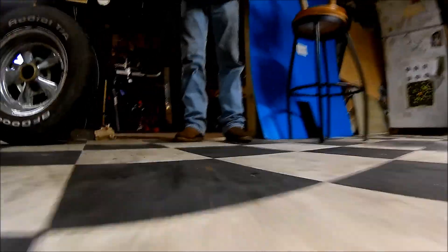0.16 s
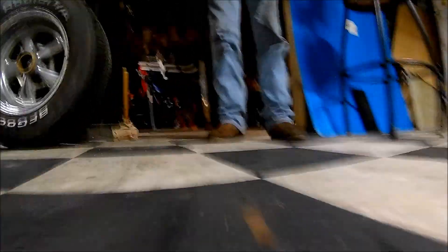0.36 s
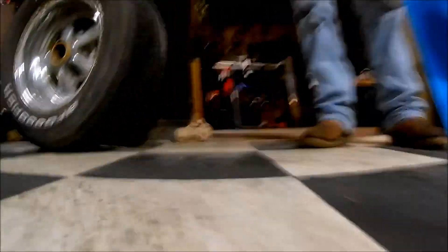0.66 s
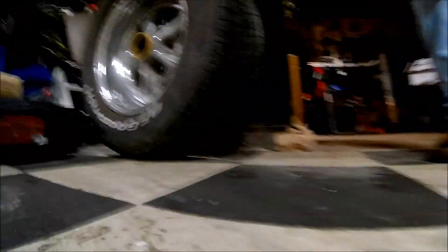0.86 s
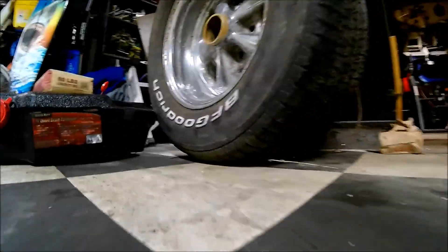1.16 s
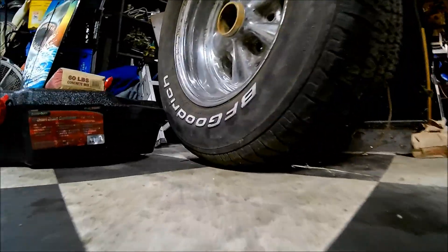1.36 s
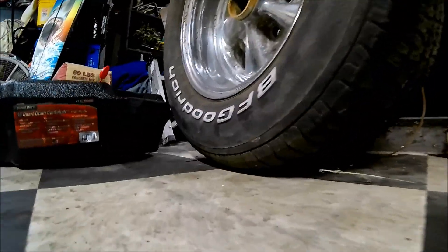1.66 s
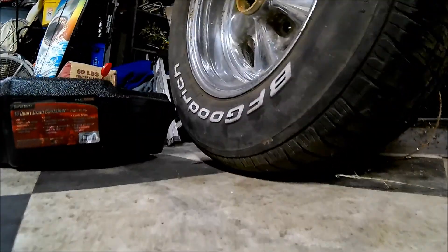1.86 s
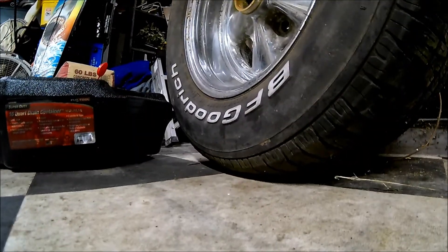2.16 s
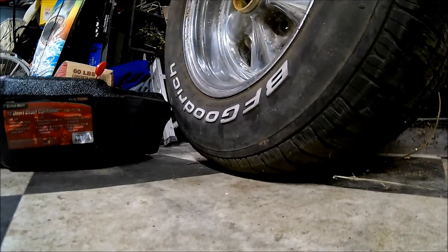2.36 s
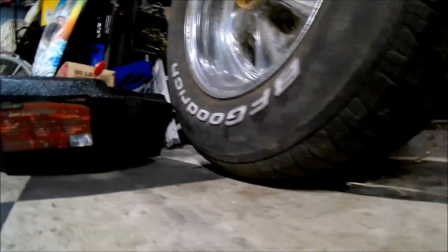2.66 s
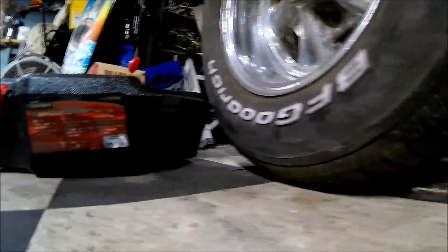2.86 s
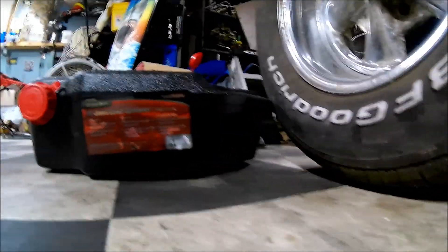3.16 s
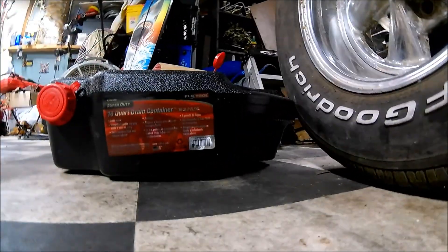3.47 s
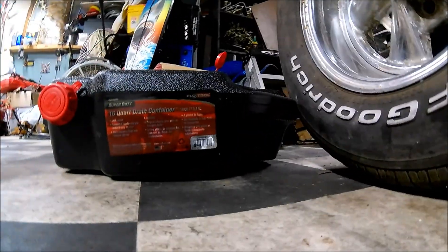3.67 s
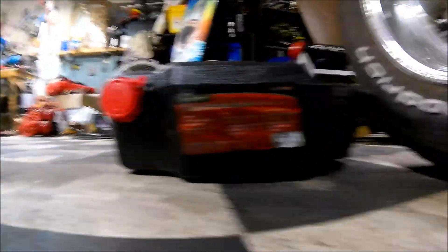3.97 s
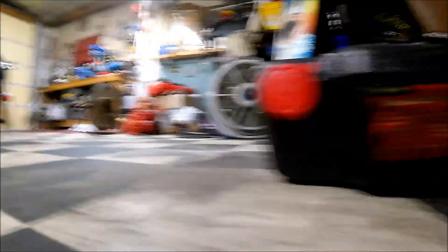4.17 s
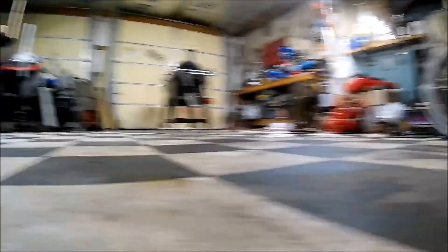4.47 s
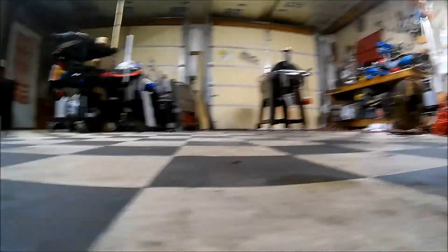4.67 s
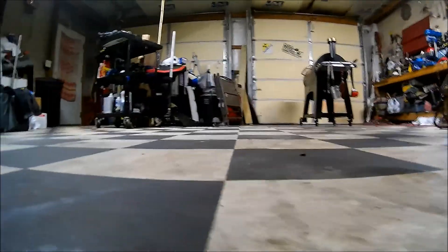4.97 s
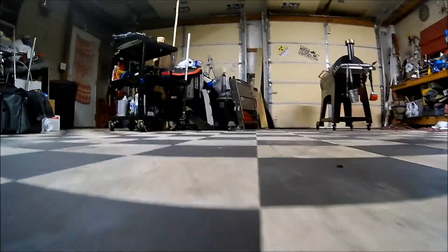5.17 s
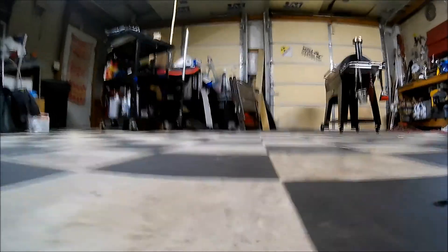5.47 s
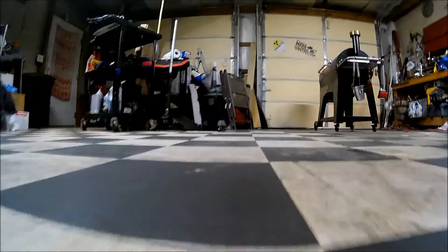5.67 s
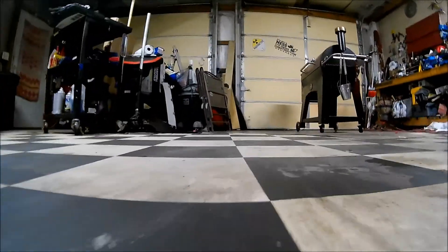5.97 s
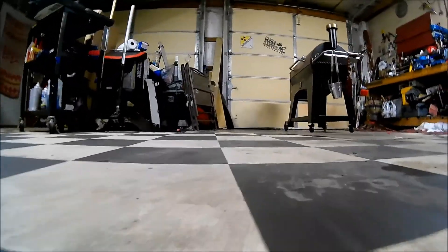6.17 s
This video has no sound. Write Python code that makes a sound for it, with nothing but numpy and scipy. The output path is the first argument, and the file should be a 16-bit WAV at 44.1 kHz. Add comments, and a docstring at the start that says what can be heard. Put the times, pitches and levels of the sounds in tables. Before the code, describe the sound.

Close, rough propeller buzz with breathy air rush rises and falls with the throttle, amid scraping, rattling and sharp knocks on a hard floor.

```python
"""A buzzing hum with its fundamental near 320 Hz, in rushing air, is heard first; scrapes and knocks join at once.
A small floor craft in a garage is driven by a three-blade electric propeller, its camera fixed to the frame.
Harmonics of the blade-pass frequency and filtered turbulence follow rotor speed; a tyre close by lifts the low tones.
The hull's modes, excited by random grit and contact chatter, scrape and knock on the tiles.
Frame resonances and the camera case colour the sound."""
import sys
import numpy as np
from scipy import signal
from scipy.fft import rfft, irfft, next_fast_len
from scipy.io import wavfile
from scipy.ndimage import uniform_filter1d

SR = 44100
rng = np.random.default_rng(int(sys.argv[2]) if len(sys.argv) > 2 else 0)


def waveform_to_disk(signal):
    """Save audio, clipped to [-1, 1], as 16-bit WAV at the path in sys.argv[1]."""
    frames = np.transpose(np.atleast_2d(signal))
    scaled = np.clip(frames, -1, 1) * 32767
    samples = np.round(scaled).astype(np.int16)
    wavfile.write(sys.argv[1], SR, samples)


N = 279153  # samples
BLADES = 3
REFERENCE_HZ = 270  # blade-pass frequency at which the speed laws are stated
SWITCH_HZ, TOP_HZ = 7994, 15700  # motor controller's switching tone; camera's band limit

# Rotor throttle: t/s, blade-pass f/Hz before inertia, shift of tones 1-3 level/dB,
# shift of tones 7 upwards level/dB, 4th, 5th and 6th tone level/dB before gusts
THROTTLE = [(0.0, 323.4, 2, -2, -45, -32.5, -42), (0.2, 321.5, -3, -1.5, -43.5, -34, -47),
            (0.351, 320.2, -0.5, -1, -46, -35, -40), (0.42, 302.7, -0.5, 1, -53, -39.5, -43),
            (0.5, 268.7, 0.5, -3.5, -53, -55, -39), (0.6, 231.3, -5, -8, -49.5, -43, -45),
            (0.67, 228.7, -10.5, -3, -54.0, -53, -49), (0.791, 245.9, -8, 0.5, -51, -44.5, -46),
            (0.9, 240, -5.5, -6.5, -53, -52, -42.5), (1.04, 241.7, -7, -1.5, -51.5, -45, -43.5),
            (1.18, 245.4, -4, -6.5, -52, -46, -40), (1.299, 225.1, -8, -2, -49, -50, -53),
            (1.4, 233.7, -3.5, -2, -71, -45.5, -46), (1.7, 242.8, -4.5, -3, -49, -48.5, -50),
            (1.85, 244.6, -0.5, 2.5, -46, -46, -35.5), (2.1, 243.7, -1, -3.5, -49, -60, -50),
            (2.34, 247.8, 0, -2, -58, -51.5, -41.5), (2.49, 276.3, 5, -2, -45, -44, -43.5),
            (2.59, 283.6, 0.5, -2.5, -60, -46.5, -40.5), (2.8, 284.3, 3, -2.5, -51.5, -44, -50.5),
            (3.02, 287, -1, -0.5, -49, -39, -43), (3.13, 276, 0, 0, -46, -39, -43.5),
            (3.24, 271.7, 3, -5, -51, -46.0, -44.5), (3.45, 269.6, 1.5, -0.5, -48, -55, -47),
            (3.66, 273.3, -0.5, -3.5, -49.5, -46.5, -43), (3.75, 285.7, -4, 3, -51, -45.5, -46),
            (3.88, 320.9, 1.5, -0.5, -44.5, -37.5, -42), (4.03, 344.1, 0, -0.5, -45, -44, -42.5),
            (4.12, 350.7, -0.5, 0.5, -38, -38.5, -40.5), (4.199, 338, -1.5, 2.5, -31.5, -41.5, -46),
            (4.3, 293.3, -5, 2, -49, -37.5, -38.5), (4.35, 275.8, -3.5, 1.5, -46.5, -41, -47),
            (4.44, 239.9, -5.5, 0.5, -50, -68, -44.5), (4.6, 192.5, -8.5, -2.5, -53, -52, -62),
            (4.72, 178.4, -9.5, -5.5, -63, -66, -66), (4.81, 187.3, -3.5, -7.5, -48, -68, -57),
            (4.9, 229.9, -3, -0.5, -50.5, -56, -49.5), (4.97, 267.5, -6, 2.5, -47, -59, -43),
            (5.04, 303, -3, 0, -50, -44, -39), (5.11, 325, 0.5, -1, -52, -41, -44),
            (5.22, 335.5, 0.5, -1, -45.5, -33, -37), (5.34, 346.1, 3, -3.5, -41, -37.5, -38),
            (5.45, 336.2, 2, -3, -44.5, -33, -38.5), (5.57, 293.8, -1.5, 0.5, -57, -39.5, -44),
            (5.73, 306, 2, -8, -51, -36, -42), (5.86, 287.7, -4, -1.5, -45, -40.5, -45),
            (5.99, 268.4, -5, -1.5, -50, -48, -41), (6.12, 266.1, -2, -2, -49, -49.5, -41),
            (6.26, 277.5, 1.5, -4.5, -46, -46.5, -40), (6.33, 269.6, -2, 0, -47, -44, -41)]
# Shaft and magnet orders: order per turn, level/dB at the reference, slope/(dB per octave of speed)
SHAFT_ORDERS = [(4, -65, 26.5), (5, -66.5, 27.5), (7, -72.5, 15.5), (8, -61, 5), (13, -57.5, 19),
                (42, -73, 30.5)]
# Frame gain on blade tones 7 upwards: f/Hz, gain/dB
FRAME_GAIN = [(650, 14), (1000, -7), (1300, -1.5), (1600, 1), (1800, -4.5), (2000, -1.5), (2200, -1),
              (2350, 0), (2520, -4.5), (2750, -20.5), (3100, -14.5), (3500, -20.5), (4000, -27),
              (4400, -32.5), (4850, -28), (5300, -40.5), (6000, -56)]
# Spectral shape of the air rush: f/Hz, relative density level/dB
AIR_SPECTRUM = [(60, -64.5), (150, -22.5), (400, -19), (700, -10.5), (1100, -8), (1500, -3.5), (1800, -5.5),
                (2300, -1.5), (2550, -6.5), (2800, -13.5), (4000, -18), (4900, -20.5), (5600, -35),
                (6200, -47)]
# Hull modes: centre f/Hz, width f/Hz, relative level/dB
HULL_MODES = [(258, 108, -6.5), (740, 290, -0.5), (1193, 340, -1), (1560, 526, 0.5), (1894, 220, 1),
              (2300, 750, -8.5)]
# Knocks on the tiles: t/s, relative drive of the crack level/dB, of the thud level/dB
KNOCKS = [(0.0827, -9, -21.5), (0.1162, -17, -21), (0.144, -8, -45), (0.225, -9, -60), (0.3222, -8, -67),
          (0.379, -13, -61), (0.4855, -6.5, -44), (0.509, -8, -42), (0.575, -6.5, -61), (0.762, -15, -30),
          (0.7971, -9.5, -26.5), (0.8082, -6.5, -45), (0.8102, -2.5, -38), (0.8144, -7, -48),
          (0.9395, -14, -26), (2.4891, -22.5, -37), (4.4465, -34, -23.5), (5.3998, -19, -20),
          (5.589, -11.5, -37), (5.6497, -7, -42), (5.7346, -4.5, -54), (5.77, -7, -60), (5.78, -13, -43),
          (5.826, -21, -47), (5.8657, -8, -58), (5.882, -13, -48), (5.968, -15, -50)]
# Shape of the faint treble above the microphone's roll-off: f/Hz, relative density level/dB
TREBLE_SPECTRUM = [(5500, -48), (6200, -6), (6400, -5.5), (6520, -11.5), (6650, -6), (6950, 0.5),
                   (7350, -7), (7500, -19.5), (7650, -6.5), (7900, -1.5), (9500, -7), (12500, -21.5),
                   (15500, -17.5)]
# Bursts of crackling grit: t/s, half-length (to 1/e) t/s, peak level/dB
CRACKLE_BURSTS = [(.07, .01, -82), (.135, .02, -81), (.213, .002, -81), (.29, .008, -83), (.47, .012, -84),
                  (.493, .002, -76), (.508, .004, -80), (.578, .006, -82), (.81, .012, -86)]
# Colour of the crackle, on top of the treble shape: f/Hz, gain/dB
GRIT_COLOUR = [(5500, -5), (7800, -5), (8800, 0.5), (10500, -0.5), (15500, -6.5)]
# High motor tones: start f/Hz, shaft orders added, level/dB at the reference before the case's gain
MOTOR_TONES = [(7994, -14, -99), (0, 70, -105), (0, 78, -110)]
# Camera case resonance: centre f/Hz, width f/Hz, gain/dB
CASE_RESONANCE = (6350, 70, 12)
# Nearness of the tyre that throws the sound back: t/s, nearness from 0 to 1
TYRE_NEARNESS = [(0, 0), (.6, 0.1), (1.3, 0.3), (1.8, 0.79), (3.0, 0), (4.2, 1), (4.8, 1), (5.2, 0.07),
                 (6.33, 0)]
# Speed laws below: level/dB at the reference, slope/(dB per octave of speed), shift/dB at the tyre
# Blade tones 1-3, before throttle shift, gusts and frame resonance
LOW_TONE_LAWS = [(-50.5, 24, 3), (-49.5, 10, 7), (-49.5, 13, 6.5)]
# Blade tones 7 upwards, before throttle shift, gusts and frame gain
UPPER_TONE_LAW = (-43.5, 11.4, 0)
# Unbalance once and twice a turn, before frame resonance
UNBALANCE_LAWS = [(-68.5, 38, -0.15), (-69.5, 34.5, 0.0013)]
# Air rush, before its flicker and added treble
AIR_LAW = (-40.8, 10, -2)
# Hull sliding on the tiles: t/s, rumble level/dB before a fixed 9 dB lift, rattle level/dB
SLIDE = [(0, -53, -39.5), (.3, -56, -35.5), (.42, -54.5, -37), (.5, -49, -35.5), (.62, -58, -44),
         (.75, -50.5, -40.5), (1.0, -55, -41.5), (1.3, -55.5, -47), (1.57, -57.5, -47), (1.75, -64, -44.5),
         (2.3, -71, -50), (3.1, -62, -49), (3.7, -70, -52), (4.3, -58, -47), (4.55, -63.5, -44.5),
         (4.67, -65, -45), (4.72, -68, -54), (5.0, -58, -55), (5.25, -51, -48.5), (5.6, -51, -39),
         (5.8, -52.5, -40), (5.95, -53.5, -37), (6.33, -53, -43)]
# Frame resonances met by gliding tones: centre f/Hz, width f/Hz, gain/dB (negative damps)
FRAME_RESONANCES = [(103, 27, 6), (157.7, 12, 13.5), (234, 51, 5), (560, 37, 0.5), (818, 24, -5.5),
                    (848, 40, 8), (1060, 160, -1.5)]


def amp(db):
    """Decibel law: amplitude ratio from level."""
    return 10 ** (np.asarray(db) / 20)


def unit(x):
    """Normalisation to rms 1."""
    return x / np.sqrt(np.mean(x ** 2) + 1e-20)


def along(points, hz):
    """Interpolation of (f/Hz, level/dB) points on a log frequency axis; -120 dB outside."""
    f, level_db = np.transpose(points)
    return np.interp(np.log(hz + 1), np.log(f + 1), level_db, left=-120, right=-120)


def curves(rows):
    """Linear interpolation in time: one value per sample for each column after t/s."""
    times, *columns = np.transpose(rows)
    t = np.arange(N) / SR
    return [np.interp(t, times, column) for column in columns]


def wobble(rate):
    """Slow random modulation: Gaussian knots, rate per second, joined by straight lines."""
    return np.interp(np.arange(N) * rate / SR, np.arange(4000), rng.standard_normal(4000))


def filtered(x, response):
    """Linear filtering: the spectrum of x times a response of frequency, zero-padded."""
    m = next_fast_len(N + SR // 2)
    spectrum = rfft(x, m) * response(np.fft.rfftfreq(m, 1 / SR))
    return irfft(spectrum, m)[..., :N]


def resonance_db(hz, centre, width, gain_db):
    """Resonance: a bell of gain in dB about its centre, half as many dB at the edges of its width."""
    return gain_db / (1 + (2 * (hz - centre) / width) ** 2)


def hull(f, modes=HULL_MODES):
    """Modal superposition: causal resonances of alternating sign; soft plastic passes little treble."""
    ring = 0
    for k, (centre, width, db) in enumerate(modes):
        mode = 1j * f * width / (centre * centre - f * f + 1j * f * width)
        ring = ring + (-1) ** k * amp(db) * mode
    return ring / (1 + 1j * f / 3800 / 0.93 - (f / 3800) ** 2) ** 3


def tone(angle, db, flicker_db, sway):
    """Amplitude and phase modulation: a sine wavers as the blades cut uneven air."""
    phase = angle + sway * (wobble(30) + .8 * wobble(90) + wobble(2.5))
    flicker = .3 * wobble(10) + .6 * wobble(28) + wobble(60) + .7 * wobble(130)
    return np.sqrt(2) * amp(db + flicker_db * flicker) * np.cos(phase)


def blade_pass():
    """Rotor inertia: a moving average rounds every change of the blade-pass frequency in Hz."""
    frequency = curves(np.array(THROTTLE)[:, :2])[0]
    return uniform_filter1d(frequency, size=1500, mode="nearest")


def speed_octaves():
    """Logarithmic speed: octaves of blade-pass frequency from the reference."""
    return np.log2(blade_pass() / REFERENCE_HZ)


def by_speed(db, slope_db, near_db):
    """Power law of speed: the level climbs with the rotor and shifts near the tyre."""
    return db + slope_db * speed_octaves() + near_db * np.clip(curves(TYRE_NEARNESS)[0], 0, 1)


def lifted(hz):
    """Structural resonance: summed gain in dB that the frame gives a tone."""
    return sum(resonance_db(hz, *ring) for ring in FRAME_RESONANCES)


def blade_tones(angle):
    """Harmonic series of the blade pass: clean low tones, a flickering whine and upper tones."""
    pass_hz = blade_pass()
    _, low_db, upper_db, *whine_db = curves(THROTTLE)
    # uneven inflow shakes the tones together, the lowest three only slightly
    gust_db = .7 * wobble(9) + 1.5 * wobble(30) + 1.3 * wobble(110)
    # changing speed roughens the tones from the 4th upwards
    strain = 1 + np.abs(np.gradient(pass_hz)) * SR / 450

    def blade(k):
        """Dispersion: the ringing frame smears each pass, so higher tones lag."""
        return k * angle - .11 * k * k

    sound = np.zeros(N)
    for k, law in enumerate(LOW_TONE_LAWS, start=1):
        level_db = by_speed(*law) + low_db + 0.18 * gust_db + lifted(k * pass_hz)
        sound += tone(blade(k), level_db, flicker_db=1.73, sway=0.032)
    for k, db in enumerate(whine_db, start=4):
        sound += tone(blade(k), db + .8 * gust_db, flicker_db=2.2, sway=.27 * strain)
    rest_db = by_speed(*UPPER_TONE_LAW) + upper_db + gust_db
    for k in range(7, 22):
        level_db = rest_db + along(FRAME_GAIN, k * pass_hz)
        sound += tone(blade(k), level_db, flicker_db=3, sway=.046 * min(k, 10) * strain)
    return sound


def shaft_tones(angle):
    """Rotational orders: weak shaft and magnet tones, and unbalance once and twice a turn."""
    turn = angle / BLADES
    sound = np.zeros(N)
    for order, db, slope_db in SHAFT_ORDERS:
        sound += tone(order * turn, by_speed(db, slope_db, 0), flicker_db=2.5, sway=0.93)
    for order, law in enumerate(UNBALANCE_LAWS, start=1):
        level_db = by_speed(*law) + lifted(order * blade_pass() / BLADES)
        sound += tone(order * turn, level_db, flicker_db=1.44, sway=.05)
    return sound


def air(angle):
    """Blade-tip turbulence: patchy noise puffs once per blade pass; faster tips hiss brighter."""
    octaves = speed_octaves()
    cells = signal.stft(rng.standard_normal(N), nperseg=512)[2]
    # smoothing over frequency, then time, makes patches
    patches = uniform_filter1d(uniform_filter1d(rng.standard_normal(cells.shape), 5, 0), 6, 1)
    noise = signal.istft(cells * amp(1.0 * unit(patches)), nperseg=512)[1][:N]
    puffs = noise * (1 + 0.057 * np.cos(angle))
    rush = unit(filtered(puffs, lambda hz: amp(along(AIR_SPECTRUM, hz))))
    top = filtered(rush, lambda hz: 1 / (1 + (4200 / (hz + 1)) ** 6))
    treble = unit(filtered(puffs, lambda hz: amp(along(TREBLE_SPECTRUM, hz))))
    # the band above 4200 Hz gains a further 12 dB per octave of speed
    bright = top * (amp(12.0 * octaves) - 1) + amp(-45.0 + 3 * octaves) * treble
    return amp(by_speed(*AIR_LAW) + 0.23 * wobble(34)) * (rush + bright)


def motor_whine(angle):
    """Sidebands and orders: the switching tone's lower sideband and high shaft orders, lifted by the case."""
    t = np.arange(N) / SR
    sound = np.zeros(N)
    for start_hz, order, db in MOTOR_TONES:
        hz = start_hz + order * blade_pass() / BLADES
        phase = 2 * np.pi * start_hz * t + order * angle / BLADES
        level_db = by_speed(db, 6, 0) + resonance_db(hz, *CASE_RESONANCE)
        sound += tone(phase, level_db, flicker_db=1.7, sway=.1)
    return sound


def rumble():
    """Sliding friction: sparse random grit impulses excite the hull's two lower modes."""
    grit = (rng.random(N) < .05) * rng.standard_normal(N) * amp(3 * wobble(30))
    ringing = unit(filtered(grit, lambda f: hull(f, HULL_MODES[:2]) / (1 + 1j * f / 900)))
    return amp(curves(SLIDE)[0] + 9.0) * ringing


def rattle_and_crackle():
    """Impulsive friction: clumped ticks rattle the upper modes and crackle faintly in the treble."""
    rattle_db = curves(SLIDE)[1]
    ticks = (rng.random(N) < .03) * rng.standard_normal(N) * amp(2.3 * wobble(45))
    rattle = unit(filtered(ticks, lambda f: hull(f, HULL_MODES[2:])))
    crackle_db = lambda hz: along(TREBLE_SPECTRUM, hz) + along(GRIT_COLOUR, hz)
    crackle = unit(filtered(ticks, lambda hz: amp(crackle_db(hz))))
    t = np.arange(N) / SR
    bursts = sum(amp(db) * np.exp(-((t - s) / width) ** 2) for s, width, db in CRACKLE_BURSTS)
    return amp(rattle_db) * rattle + (amp(rattle_db - 54.5) + bursts) * crackle


def camera_floor():
    """Self-noise: low-weighted microphone hiss and the controller's thin switching tone."""
    hiss = unit(filtered(rng.standard_normal(N), lambda hz: 1 / np.sqrt(1 + hz / 300)))
    thin_tone = np.sin(2 * np.pi * SWITCH_HZ * np.arange(N) / SR)
    return amp(-89.0) * hiss + amp(-98.5) * thin_tone


def knocks():
    """Impact excitation: a short crack rings the upper modes, a soft push with a rough tail the lower."""
    cracks, bumps = np.zeros(N + SR), np.zeros(N + SR)
    t = np.arange(2500) / SR
    for s, crack_db, thud_db in KNOCKS:
        start = round(s * SR)
        # contact chatter of even strength
        crack_chatter, bump_chatter = np.sign(rng.standard_normal((2, len(t))))
        # 60 dB decay times of 7.4 ms and 91 ms, each with a soft onset
        crack_shape = amp(crack_db + 7.5 - 60 * t / 0.0074) * (1 - np.exp(-t / 0.00065))
        bump_shape = amp(thud_db + 18 - 60 * t / 0.091) * (1 - np.exp(-t / 0.0026))
        push = 0.42 * np.exp(-t / 0.0022)
        cracks[start:][:len(t)] += crack_shape * crack_chatter
        bumps[start:][:len(t)] += bump_shape * (bump_chatter + push)

    def hard(f):
        """Hard contact: upper modes, favoured between 1200 and 3000 Hz."""
        band = (1j * f / (1200 + 1j * f)) ** 2 / (1 + 1j * f / 3000) ** 2
        return hull(f, HULL_MODES[2:]) * 2.25 * band

    def soft(f):
        """Soft contact: lower modes, low-passed at 450 Hz."""
        return hull(f, HULL_MODES[:2]) / (1 + 1j * f / 450) ** 2

    return filtered(cracks[:N], hard) + filtered(bumps[:N], soft)


def scene():
    """Superposition of all sources in one channel."""
    angle = 2 * np.pi * np.cumsum(blade_pass()) / SR  # blade-pass phase/rad
    rotor = blade_tones(angle) + shaft_tones(angle) + air(angle) + motor_whine(angle)
    return (rotor + rumble() + rattle_and_crackle() + knocks())[None]


def record(dry):
    """Receiver response: the camera thins the bass, dips at its case, adds its floor and limits the band."""
    def response(hz):
        """Notch of 45 Hz width at 700 Hz, and a second-order high-pass at 110 Hz."""
        dip = 1 - .9 * 1j * hz * 45 / (700 ** 2 - hz * hz + 1j * hz * 45)
        return dip * (1j * hz / (110 + 1j * hz)) ** 2

    thin = filtered(dry, response)
    return filtered(thin + camera_floor(), lambda hz: hz < TOP_HZ)


dry = scene()
out = record(dry)
waveform_to_disk(out)
```